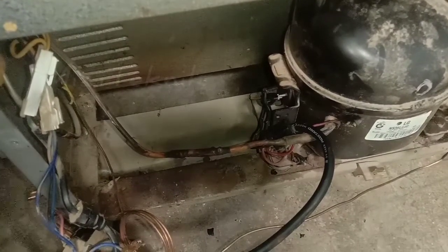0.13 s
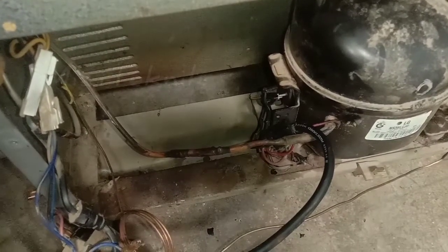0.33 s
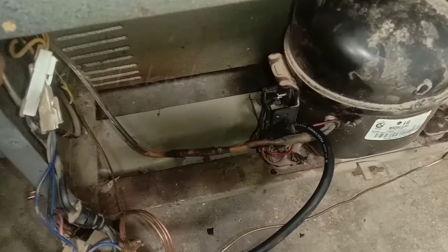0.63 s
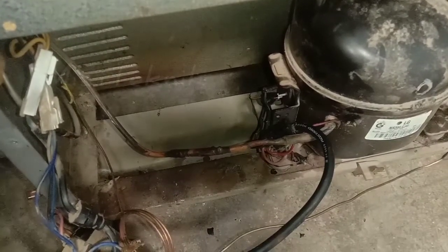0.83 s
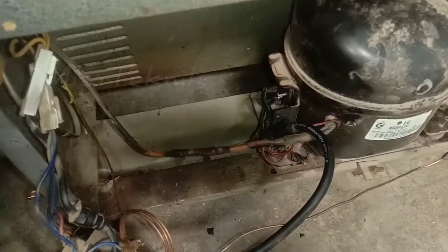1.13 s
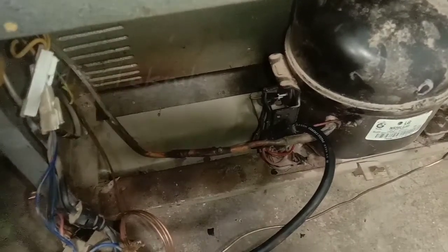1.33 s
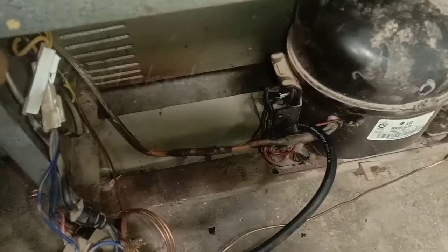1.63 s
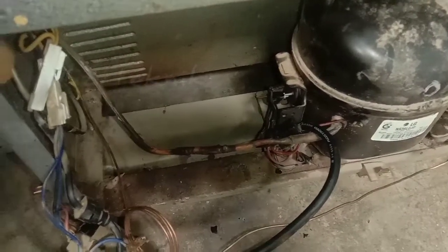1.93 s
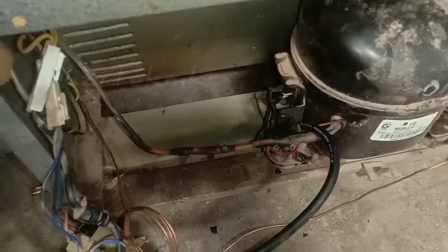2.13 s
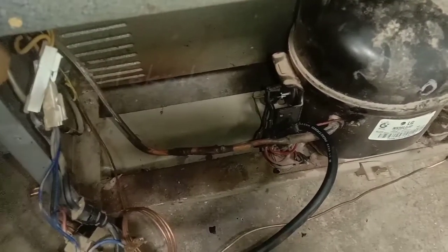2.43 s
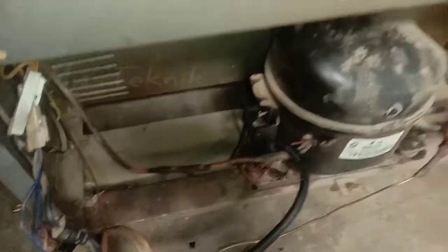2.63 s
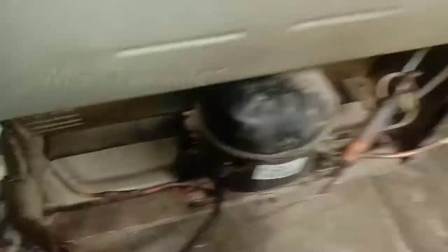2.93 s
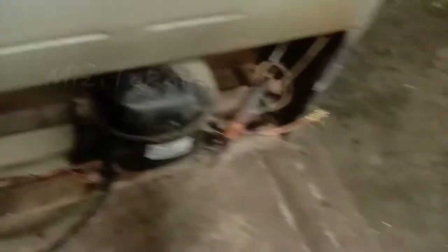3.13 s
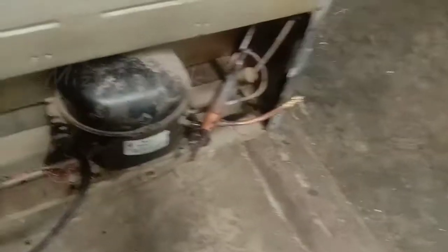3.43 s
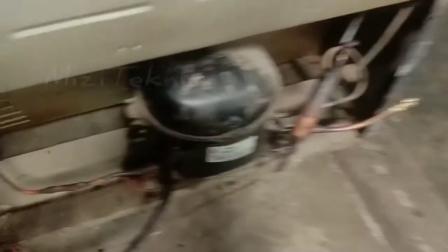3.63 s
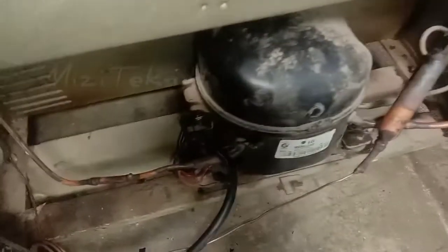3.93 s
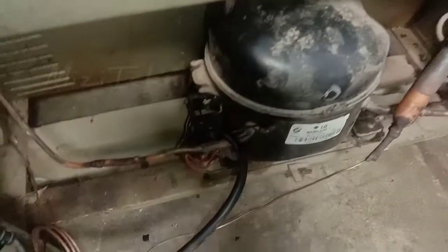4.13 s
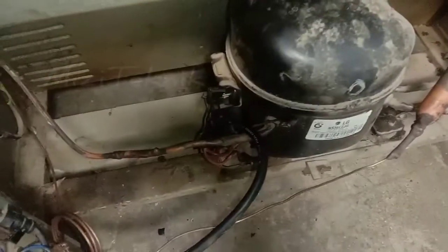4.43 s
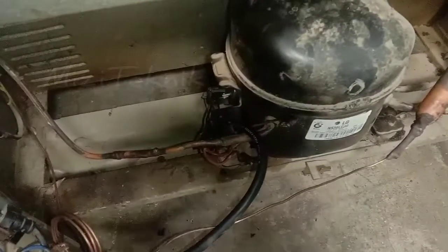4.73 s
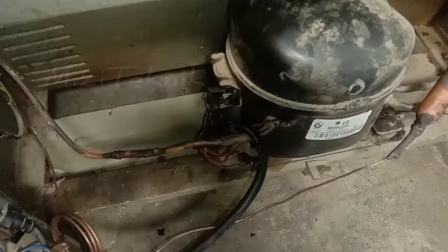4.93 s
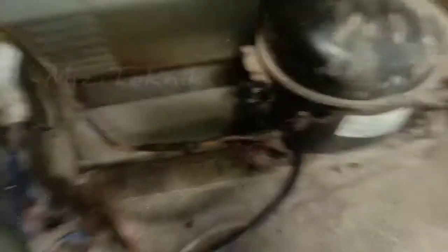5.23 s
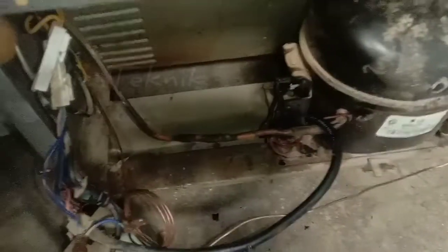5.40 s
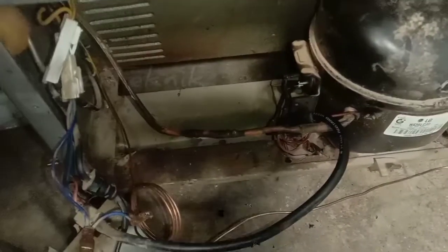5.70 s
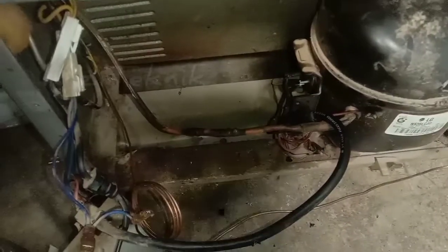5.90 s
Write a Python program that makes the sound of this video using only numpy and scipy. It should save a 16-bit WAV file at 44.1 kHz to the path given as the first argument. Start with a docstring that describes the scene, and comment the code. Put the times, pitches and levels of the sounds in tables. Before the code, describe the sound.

Close to a mono microphone in a quiet workshop, small metal and plastic parts clatter and scrape, ending in a loud sharp drop. After a near-silent gap come short gritty slides and a squeaky scrape, then a faint hollow rattle, dry ticks and dull knocks, a tiny bright steel clink and a final flurry of low bumps. Faint rumble and hiss lie beneath, with short room tails.

```python
"""On a workshop floor, small metal and plastic parts are handled near a mono microphone over quiet room noise.
A clatter, a sharp drop, a hollow rattle, a bright clink, ticks and dull knocks are noise bursts ringing resonances.
Sliding scrapes, narrow singing bands and low drags are grains of noise, coloured and shaped stroke by stroke.
The room answers the parts, knocks and rubbing with short diffuse tails."""
import sys
import numpy as np
from scipy import signal
from scipy.fft import rfft, irfft, next_fast_len
from scipy.io import wavfile
from scipy.ndimage import uniform_filter1d, map_coordinates

SR = 44100
rng = np.random.default_rng(int(sys.argv[2]) if len(sys.argv) > 2 else 0)


def to_wav(sig):
    """Store sig (one row per channel, or 1-D mono) as 16-bit WAV at the path in sys.argv[1].

    Samples outside -1..1 are clipped; the rate is SR.
    """
    pcm = np.clip(np.atleast_2d(sig), -1, 1) * 32767
    pcm = np.round(pcm).astype(np.int16)
    wavfile.write(sys.argv[1], SR, pcm.T)  # frames by channels


def to_linear_factor(level_db):
    """Convert decibel levels (scalar or array-like) to linear amplitude factors."""
    exponent = np.asarray(level_db, float) / 20
    return 10 ** exponent


N = 267334  # samples

# resonances of the heavy thing under the parts: pitch_hz, width_hz, level_db
HEAVY_MODES = [(102, 60, -8.5), (170, 94, -1.5), (271, 81, -2), (441, 57, 1.5), (590, 170, -4),
               (850, 300, -5)]
SLIDE_STOP_DB_PER_S = 275.5  # fall of a scrape once the hand lets go


def unit(x):
    """Scaled to rms 1."""
    return x / np.sqrt(np.mean(x ** 2) + 1e-20)


def along(points, hz):
    """(Hz, value) points read on a log frequency axis."""
    point_hz, value = np.transpose(points)
    return np.interp(np.log(hz + 1), np.log(point_hz + 1), value)


def filtered(x, response):
    """x times a response of frequency."""
    size = next_fast_len(len(x) + SR // 4)
    spectrum = rfft(x, size) * response(np.fft.rfftfreq(size, 1 / SR))
    return irfft(spectrum, size)[:len(x)]


def resonances(f, modes):
    """A sum of causal resonant peaks with alternating signs; modes are (Hz, width Hz, dB)."""
    total = 0
    for k, (hz, width, db) in enumerate(modes):
        total = total + (-1) ** k * to_linear_factor(db) * 1j * f * width / (hz * hz - f * f + 1j * f * width)
    return total


def patchy(depth_db, lasting=6):
    """White noise with random patches of gain in time and frequency; lasting counts spectral frames."""
    z = signal.stft(rng.standard_normal(N), nperseg=512)[2]
    field = uniform_filter1d(rng.standard_normal(z.shape), size=3, axis=0)
    field = uniform_filter1d(field, size=lasting, axis=1)
    return unit(signal.istft(z * to_linear_factor(depth_db * unit(field)), nperseg=512)[1][:N])


def gritty(grains_per_s, spread_db, life_s):
    """Noise in short decaying grains of unequal size; its colour drifts as the contact moves."""
    count = int(grains_per_s * N / SR)
    where, size = rng.random((count, 2)).T
    kicks = np.bincount((where * N).astype(int), to_linear_factor(-spread_db * np.log(size + 1e-9)), N)
    grains = signal.lfilter([1], [1, -np.exp(-1 / (life_s * SR))], kicks)
    return unit(grains * patchy(depth_db=2.5, lasting=16))


def wobble(knots_per_s):
    """A smooth random curve through random knots."""
    knots = rng.standard_normal(int(N * knots_per_s / SR) + 4)
    return map_coordinates(knots, [np.arange(N) * knots_per_s / SR])


def shifting(x, modes):
    """Each resonance of what slides comes and goes, and wanders in pitch, as the grip changes."""
    strength_db, pitch_share, shifts_per_s = 4, 0.025, 14
    f, t, z = signal.stft(x, SR, nperseg=512)
    at = np.minimum(t * SR, N - 1).astype(int)
    moving = []
    for hz, width, db in modes:
        moving_hz = hz * (1 + pitch_share * wobble(shifts_per_s)[at])
        moving_db = db + strength_db * wobble(shifts_per_s)[at]
        moving.append((moving_hz, width, moving_db))
    gain = np.hypot(1, abs(resonances(f[:, None], moving)))  # the plain rubbing stays underneath
    return signal.istft(z * gain, SR, nperseg=512)[1][:N]


def played(strokes, levels_db, stop_db_per_s, grows=1):
    """Gain per sample: strokes swell, sag while held and stop, all dB slopes times grows; overlaps add in power."""
    rise_db, sag_db_per_s = 17, 32
    power = np.zeros(N)
    for (start_s, rise_s, hold_s), level_db in zip(strokes, levels_db):
        start = round(start_s * SR)
        t = np.arange(min(N - start, SR)) / SR
        swell = -rise_db * np.clip(1 - t / (rise_s + 1 / SR), 0, 1)
        sag = -sag_db_per_s * np.clip(t - rise_s, 0, hold_s)
        stop = -stop_db_per_s * np.clip(t - rise_s - hold_s, 0, None)
        power[start:][:len(t)] += to_linear_factor(level_db + grows * (swell + sag + stop)) ** 2
    return uniform_filter1d(np.sqrt(power), size=90)  # two milliseconds of smoothing


def struck(times_s, peaks_db, modes, contact_ms, top_hz, scatter_db=3, soft=.25):
    """Each contact is a short noise burst that excites the resonances at new strengths, duller above top_hz."""
    out, t = np.zeros(N + SR), np.arange(SR // 4) / SR
    f = np.fft.rfftfreq(len(t), 1 / SR)
    fade = (1 - (t / t[-1]) ** 2) ** 2
    for at_s, peak_db, ms in zip(times_s, peaks_db, np.broadcast_to(contact_ms, len(times_s))):
        u = t / (ms / 1000 + 1 / SR)
        burst = rfft(u ** soft * np.exp(-u) * rng.standard_normal(len(t)))  # higher soft, softer edge
        push = burst / np.abs(burst) ** .8  # nearly even in colour
        excited = [(hz, width, db + scatter_db * rng.standard_normal()) for hz, width, db in modes]
        blow = irfft(push * resonances(f, excited) / (1 + 1j * f / top_hz) ** 3, len(t))
        out[round(at_s * SR):][:len(t)] += to_linear_factor(peak_db) * blow * fade / np.abs(blow).max()
    return out[:N]


def tick(at_s, peak_db, hz, contact_ms):
    """A dry tick: one short resonance and a weaker one above it."""
    modes = [(hz, .13 * hz, 0), (1.5 * hz, .2 * hz, -5)]
    return struck([at_s], [peak_db], modes, contact_ms, top_hz=1.5 * hz + 1500, scatter_db=1.5)


def singing_bands(grit):
    """Narrow singing bands of grit: sliding parts, and two faint bird-like or rustling swells near 5.3 kHz."""
    # singing strokes: start_s, rise_s, hold_s, level_db, pitch_hz
    singing_strokes = [(1.598, 0.036, .05, -84, 5300), (1.99, 0.057, 0.073, -80.5, 5400),
                       (2.398, .004, 0.034, -50, 3520), (2.408, 0.0034, 0.031, -50, 5640),
                       (2.517, 0.02, 0.053, -60, 2720), (2.728, 0.01, 0.035, -53.5, 2700),
                       (2.731, 0.011, 0.034, -56, 6800), (3.317, 0.08, 0.032, -40.5, 2655),
                       (3.318, 0.1, 0.027, -48, 7190), (3.606, 0.015, 0.083, -76.5, 7200)]
    total = np.zeros(N)
    for start_s, rise_s, hold_s, level_db, hz in singing_strokes:
        # two resonances at one pitch
        ring = lambda f: resonances(f, [(hz, 190, 0)]) * resonances(f, [(hz, 400, 0)])
        gain = played([(start_s, rise_s, hold_s)], [level_db], stop_db_per_s=225)
        total += gain * unit(filtered(grit, ring))
    return total


def handling():
    """Grit excites the sliding parts, a treble sheen, singing bands and, as a low drag, the heavy thing below."""
    # parts pushed along: start_s, rise_s, hold_s, scrape_db, sheen_over_scrape_db
    slides = np.array([(0, 0.086, 0.016, -68, -16), (.207, .002, 0.013, -60, 0.5),
                       (0.284, 0.0019, 0.05, -38.5, -6), (0.333, 0.026, 0.069, -38, -4),
                       (0.44, 0.021, 0.16, -44.5, -11), (0.524, 0.0055, 0.034, -42.5, -5),
                       (0.591, 0.0027, 0.063, -44, -3), (0.811, 0.011, 0.066, -45, -12),
                       (1.235, 0.0025, 0.037, -71.5, -31.5), (2.397, 0.0061, 0.049, -44, -5.5),
                       (2.449, 0.052, 0.082, -44.5, -14), (2.62, 0.012, 0.22, -53.5, -9),
                       (2.726, 0.013, 0.025, -46, -4), (2.894, 0.015, 0.035, -56.5, -27.5),
                       (3.15, 0.026, 0.12, -56, -28), (3.222, 0.051, 0.083, -44.5, -29),
                       (3.284, 0.07, 0.12, -37.5, -14), (3.539, 0.0079, 0.87, -68, -8.5),
                       (3.823, 0.016, 0.062, -59, 2), (4.256, 0.0016, 0.0073, -61, -25),
                       (4.341, .004, 0.04, -62.5, -30), (4.979, 0.0017, 0.065, -62, -6),
                       (5.038, 0.086, 0.11, -64, -38), (5.145, 0.042, 0.3, -61.5, -27),
                       (5.266, 0.0018, 0.0056, -43.5, -15.5), (5.332, 0.0066, 0.11, -55.5, -28)])
    # the heavy thing dragged on the floor: start_s, rise_s, hold_s, level_db
    drags = np.array([(0, 0.002, 0.0029, -50), (0.213, 0.016, 0.0041, -40.5), (0.275, .002, 0.14, -36.5),
                      (0.421, 0.076, 0.0066, -40), (0.5, 0.018, 0.12, -43.5), (0.843, 0.012, 0.017, -44),
                      (1.238, 0.013, 0.018, -56), (2.453, 0.089, 0.0052, -51.5),
                      (2.733, 0.013, .005, -60.5), (3.733, 0.064, 0.0037, -56.5),
                      (3.846, 0.0082, 0.18, -64), (4.34, 0.0047, 0.035, -56), (4.485, 0.01, 0.073, -62.5),
                      (4.99, 0.0029, 0.16, -65), (5.087, 0.074, 0.037, -49.5), (5.218, 0.0086, 0.035, -38),
                      (5.263, 0.0035, 0.048, -32), (5.336, 0.0091, 0.1, -43.5), (5.468, 0.0051, 0.3, -61)])
    # resonances of what slides: pitch_hz, width_hz, level_db
    sliding_modes = [(430, 120, 1), (850, 90, -1), (2000, 70, 1), (2600, 60, 6), (3520, 90, 5),
                     (4520, 90, 5), (5090, 100, 7), (5600, 100, 6), (6720, 110, 7)]
    # colour of the scrape: frequency_hz, level_db
    scrape_colour = [(200, -23), (400, -4.5), (1500, -2.5), (4000, -5.5), (7400, -9), (8200, -29),
                     (16000, -36)]
    # colour of the treble sheen: frequency_hz, level_db
    sheen_colour = [(6500, -33), (8000, -5), (10000, -2), (12500, -12), (13800, -10.5), (14800, -5),
                    (15600, -4)]
    # colour of the low drag: frequency_hz, level_db
    drag_colour = [(40, -23.5), (80, -2.5), (140, 1), (300, -10.5), (500, -13.5), (900, -26), (1500, -54.5)]
    grit = gritty(grains_per_s=3500, spread_db=2.2, life_s=.0012)
    scrape = shifting(filtered(grit, lambda f: to_linear_factor(along(scrape_colour, f))), sliding_modes)
    sheen = filtered(grit, lambda f: to_linear_factor(along(sheen_colour, f)))
    low_grit = gritty(grains_per_s=400, spread_db=2, life_s=0.008)
    drag = filtered(low_grit, lambda f: to_linear_factor(along(drag_colour, f)))
    strokes, scrape_db, sheen_db = slides[:, :3], slides[:, 3], slides[:, 3] + slides[:, 4]
    scrape_gain = played(strokes, scrape_db, SLIDE_STOP_DB_PER_S)
    sheen_gain = played(strokes, sheen_db, SLIDE_STOP_DB_PER_S, grows=1.3)  # treble swings wider
    drag_gain = played(drags[:, :3], drags[:, 3], stop_db_per_s=193)
    rubbing = scrape_gain * unit(scrape) + sheen_gain * unit(sheen) + drag_gain * unit(drag)
    return rubbing + singing_bands(grit)


def room_noise():
    """Far rumble that drifts in level, and a steady hiss, split smoothly around 450 Hz."""
    # colour of the room noise: frequency_hz, relative level_db per Hz
    noise_colour = [(30, -35), (52, -6.5), (75, 1.5), (184, -12.5), (328, -18), (437, -19), (666, -23),
                    (1250, -25), (4300, -35.5), (5310, -36), (8500, -49), (13000, -50.5), (15000, -47.5)]
    # drift of the far rumble: time_s, level_db
    rumble_level = [(0, -67.5), (1.501, -67), (3.5, -65), (4.9, -69), (6.06, -62.5)]
    low = lambda f: 1 / (1 + (f / 450) ** 4)
    rumble = filtered(patchy(depth_db=1.5), lambda f: to_linear_factor(along(noise_colour, f)) * low(f))
    hiss = filtered(patchy(depth_db=3, lasting=14), lambda f: to_linear_factor(along(noise_colour, f)) * (1 - low(f)))
    rumble_gain = to_linear_factor(np.interp(np.arange(N) / SR, *np.transpose(rumble_level)))
    return rumble_gain * unit(rumble) + to_linear_factor(-75) * unit(hiss)


def clatter():
    """Every contact rings the parts, most near its own pitch, their thin edges and the heavy thing under them."""
    # parts falling against each other: time_s, peak_db, treble_over_peak_db, loudest_hz, contact_ms
    contacts = [(0.2193, -33.5, -21.5, 1400, 2.4), (0.2848, -20, -19.5, 1270, 1.6),
                (0.2973, -14, -12, 6000, 1.4), (0.318, -13, -26, 3650, 1.6), (0.3537, -19.5, -6, 5400, 4.1),
                (0.365, -25, -4.5, 4560, 1.3), (0.3775, -23.5, -5.5, 3450, 1.2),
                (0.4166, -24.5, -23, 3990, 0.9), (0.4481, -26, -11, 1500, 2.8),
                (0.493, -28.5, -30, 1390, 1.4), (0.5218, -35.5, -3, 4360, 1.2), (0.539, -26, -7, 5070, 3.1),
                (0.593, -26.5, -2.5, 5500, 1.7), (0.6249, -31, 0.5, 5340, 2.5),
                (0.8149, -24.5, -27.5, 1500, 3.1), (0.8314, -7, -12, 2060, 0.06),
                (0.8673, -27, -20.5, 1950, 1.5)]
    # what the parts ring with: pitch_hz, width_hz, level_db
    part_modes = [(800, 200, -5), (1260, 110, 5), (1950, 250, -2), (2600, 260, -1), (3400, 250, -2),
                  (3900, 260, 0), (4600, 280, -1), (5150, 250, -1), (6000, 350, -3), (7300, 400, -2)]
    # thin edges of the parts: pitch_hz, width_hz, level_db
    thin_modes = [(8800, 150, 1), (10220, 250, 0), (11200, 1100, -9.5), (15000, 600, 6.5)]
    favour_db, favour_octaves, thud_db = 10.5, 1, -20.5  # lift near the loudest pitch, its reach; heavy thing
    bodies = np.zeros(N)
    for at_s, peak_db, _, loudest_hz, ms in contacts:
        favoured = []
        for hz, width, db in part_modes:
            nearness = np.exp(-(np.log2(hz / loudest_hz) / favour_octaves) ** 2)
            favoured.append((hz, width, db + favour_db * nearness))
        bodies += struck([at_s], [peak_db], favoured, ms, top_hz=14000, scatter_db=2.5)
    times_s, peaks_db, treble_db, _, contact_ms = np.transpose(contacts)
    thin_edges = struck(times_s, peaks_db + treble_db, thin_modes, contact_ms, top_hz=20000)
    thuds = struck(times_s, peaks_db + thud_db, HEAVY_MODES, contact_ms, top_hz=1500)
    return bodies + thin_edges + thuds


def ticks():
    """Dry ticks, some alone, some on top of knocks."""
    # dry ticks: time_s, peak_db, pitch_hz
    dry_ticks = [(1.244, -46.5, 3060), (1.81, -68.5, 8890), (4.2597, -39, 2400), (4.357, -40.5, 1870),
                 (4.406, -50, 4770), (5.205, -56, 4760), (5.272, -51, 5030), (5.445, -47, 5640),
                 (2.902, -43, 1500), (5.538, -53.5, 1710), (5.61, -57.5, 2940)]
    return sum(tick(at_s, peak_db, hz, contact_ms=2) for at_s, peak_db, hz in dry_ticks)


def knocks():
    """A soft contact rings the heavy thing; a tick rides on top, weaker or stronger than the knock."""
    # dull knocks: time_s, peak_db, tick_over_knock_db, tick_hz
    dull_knocks = [(1.26, -65.5, 14, 833), (1.279, -64, 13.5, 840), (2.522, -46, 11.5, 490),
                   (2.969, -46, 6, 850), (4.27, -26.5, -20, 1430), (4.283, -45.5, 1, 1990),
                   (4.354, -38, -5, 3970), (4.37, -40.5, -1.5, 846), (4.383, -42.5, -9, 4050),
                   (4.404, -39.5, -6, 917), (4.512, -54, 2, 3160), (5.137, -40.5, -12, 888),
                   (5.168, -37.5, -24, 1180), (5.187, -37.5, -19, 1500), (5.227, -37.5, -15, 1900),
                   (5.249, -35, -13, 2260), (5.27, -28, -6.5, 2330), (5.278, -22.5, -12, 1240),
                   (5.311, -29.5, -11, 3660), (5.339, -34, -11, 2430), (5.361, -34.5, -14, 3000),
                   (5.443, -32.5, -8.5, 2950), (5.59, -51.5, -9, 2010)]
    times_s, peaks_db = np.transpose(dull_knocks)[:2]
    tops = sum(tick(at_s, peak_db + tick_db, hz, contact_ms=2.2) for at_s, peak_db, tick_db, hz in dull_knocks)
    return struck(times_s, peaks_db, HEAVY_MODES, contact_ms=2.8, top_hz=1500) + tops


def rattle():
    """A loose hollow part chatters: soft-edged hits over a rough scrape."""
    # hits of the hollow part: time_s, peak_db
    hollow_hits = [(3.69, -45.5), (3.7175, -58), (3.737, -73), (3.776, -49), (3.809, -42.5), (3.819, -40),
                   (3.8355, -36.5), (3.847, -33.5), (3.8866, -35.5), (3.9136, -39)]
    # resonances of the hollow part: pitch_hz, width_hz, level_db
    hollow_modes = [(1560, 70, -2), (1940, 80, 1), (2440, 95, 1), (3180, 100, -6), (3800, 160, -11),
                    (5180, 200, -10), (5950, 250, -15), (7280, 200, -14), (10900, 1500, -30)]
    # its rough scrapes under the hits: start_s, rise_s, hold_s, level_db
    strokes = np.array([(3.675, .01, 0.12, -64), (3.82, 0.024, 0.072, -57)])
    grit = gritty(grains_per_s=500, spread_db=3, life_s=.002)
    scrape = filtered(grit, lambda f: resonances(f, hollow_modes))
    times_s, peaks_db = np.transpose(hollow_hits)
    hits = struck(times_s, peaks_db, hollow_modes, contact_ms=2.2, top_hz=7000, scatter_db=3.5, soft=1.2)
    return hits + played(strokes[:, :3], strokes[:, 3], SLIDE_STOP_DB_PER_S) * unit(scrape)


def clink():
    """A small solid piece of steel lands, skids and bounces, ringing in narrow modes."""
    # contacts of the steel piece: time_s, peak_db
    landings = [(4.9815, -38), (4.9905, -35.5), (5.0021, -42), (5.0135, -43), (5.037, -40.5)]
    # resonances of the steel piece: pitch_hz, width_hz, level_db
    steel_modes = [(2172, 35, -14), (5006, 25, -11), (5405, 14, 1), (5700, 120, -9), (6000, 1200, -17),
                   (5986, 25, -4), (6169, 22, -1), (6261, 20, -3), (6420, 35, -6), (8500, 30, -13),
                   (9768, 18, -4), (11250, 60, -21), (12070, 25, -14), (15100, 20, -14)]
    times_s, peaks_db = np.transpose(landings)
    return struck(times_s, peaks_db, steel_modes, contact_ms=7, top_hz=30000)


def room(x):
    """The workshop answers with decaying noise; a new diffuse tail for each quarter second."""
    # reverberation: frequency_hz, t60_s
    decay = [(150, 0.082), (1200, 0.34), (5000, 0.17), (12000, 0.022)]
    out, step = np.zeros(N + SR), SR // 4
    for start in range(0, N, step):
        hz, t, z = signal.stft(rng.standard_normal(SR // 2), SR, nperseg=256)
        fall = to_linear_factor(-60 * t / along(decay, hz)[:, None])
        tail = signal.istft(z * fall, SR, nperseg=256)[1]
        wet = signal.fftconvolve(x[start:start + step], tail / np.linalg.norm(tail))
        out[start + 100:][:len(wet)] += wet  # the answer comes 100 samples late
    return out[:N]


def cavity(x):
    """An air space near the microphone lifts one narrow band."""
    # the air space: pitch_hz, width_hz, level_db
    air_mode = (1265, 40, 13)
    return filtered(x, lambda f: np.hypot(1, abs(resonances(f, [air_mode]))))


def scene():
    """The room answers the parts more than the knocks close to the mono microphone."""
    parts, near = clatter() + clink() + rattle(), knocks() + ticks()
    rubbing = handling()
    diffuse = cavity(rubbing + room_noise())
    wet = room(to_linear_factor(-9.5) * parts + to_linear_factor(-11.5) * near + to_linear_factor(-12.0) * rubbing)
    mono = parts + near + wet + diffuse
    return np.array([mono, mono])


def band_limit(x):
    """A steep low-pass at the top of the band."""
    return signal.sosfilt(signal.butter(12, 16670, fs=SR, output="sos"), x)


def record(dry):
    """The microphone drops the deepest bass and the top treble."""
    low_cut = signal.butter(2, 48, "high", fs=SR, output="sos")
    high_cut = signal.ellip(6, .5, 34, 15550, fs=SR, output="sos")
    mix = signal.sosfilt(np.vstack([low_cut, high_cut]), dry)
    return band_limit(mix)


dry = scene()
out = record(dry)
to_wav(out)
```